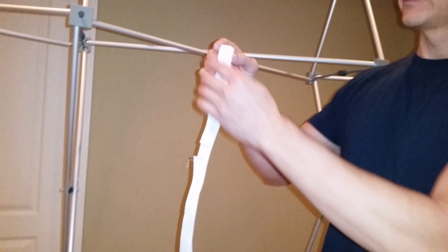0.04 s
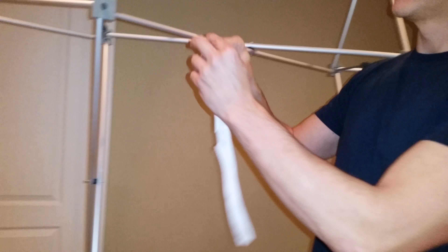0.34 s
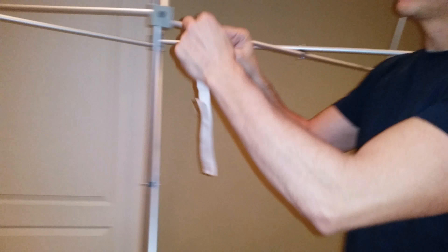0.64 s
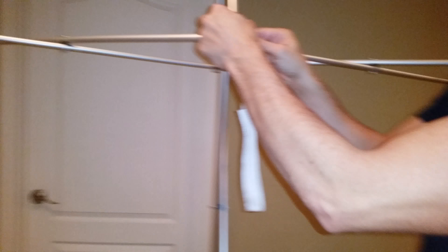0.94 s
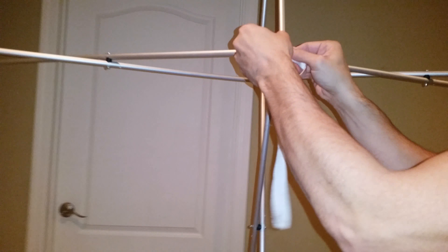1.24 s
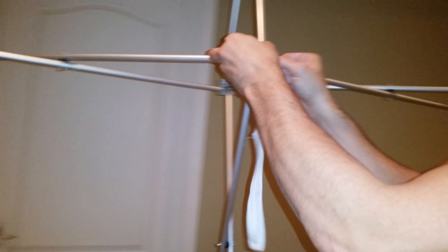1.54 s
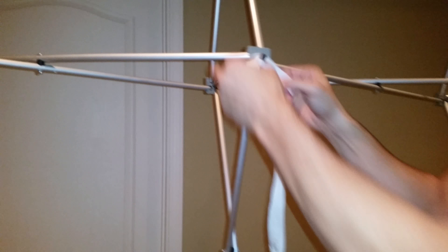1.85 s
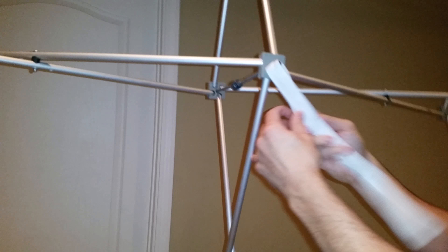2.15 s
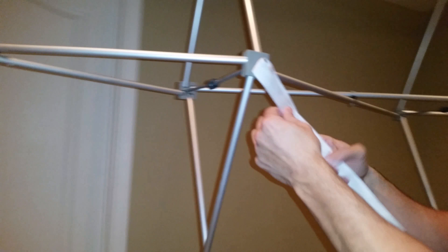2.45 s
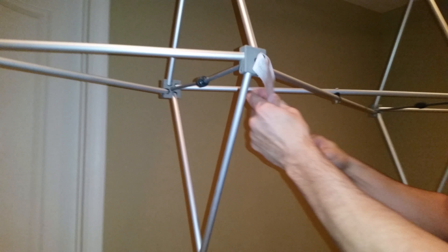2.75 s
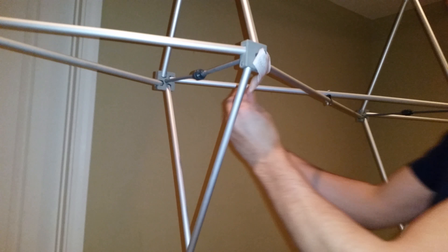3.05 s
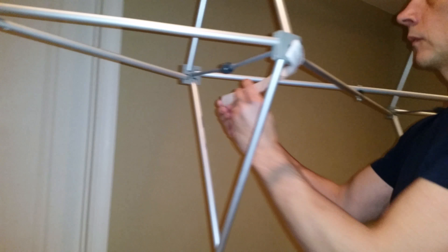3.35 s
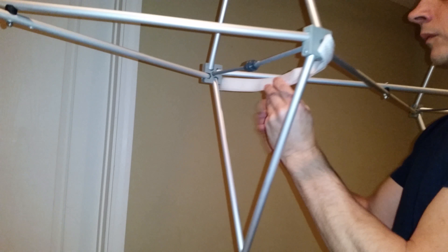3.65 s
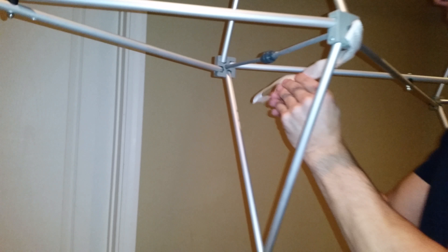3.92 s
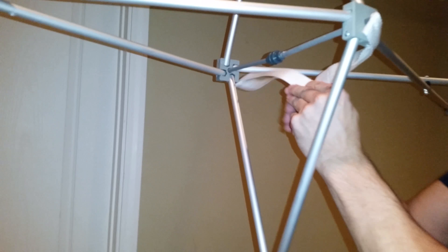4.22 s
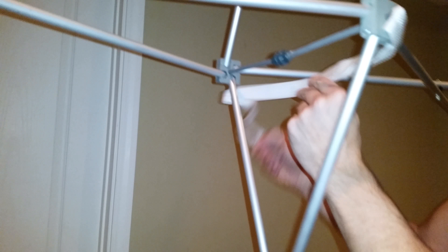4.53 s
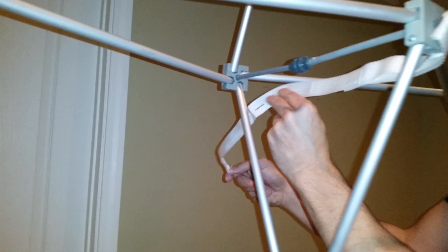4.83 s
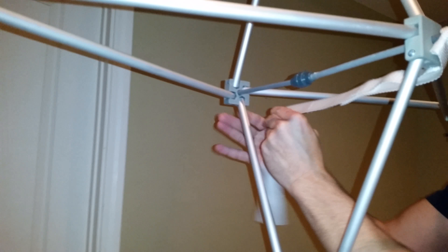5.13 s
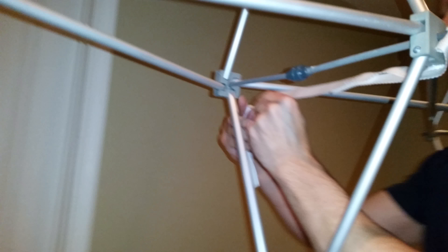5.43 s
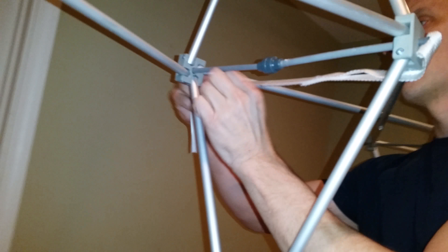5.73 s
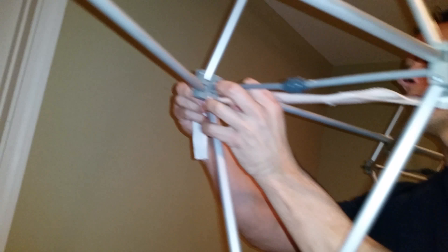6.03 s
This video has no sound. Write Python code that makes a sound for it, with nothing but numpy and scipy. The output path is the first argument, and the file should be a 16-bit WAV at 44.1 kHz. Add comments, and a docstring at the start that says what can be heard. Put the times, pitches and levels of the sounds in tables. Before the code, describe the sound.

A low, steady rumble fills a small room, with the action close to a hand-held microphone. In the first second, several dull handling knocks sound over soft rubbing as a fabric strap slides on a metal tube frame. Light taps ring briefly on the tubes at about 0.3 and 1.7 seconds. From 2 to 2.6 seconds, the strap's hook-and-loop surface crackles and snaps, with a tiny tear near 2.2 seconds and soft bumps against the frame. Faint, scattered rustling continues until about 4.2 seconds. At 4.4 seconds, sharp snaps build quickly into one short, bright rip, the loudest sound, over by 4.6 seconds. The room rumble ducks for a moment and creeps back. Quieter rubbing and stray crackles follow, with faint ticks near 5.3 seconds and a quick cluster of light metallic taps around 5.9 to 6 seconds.

```python
"""A small room, rumbling low; the two microphone ports of a hand-held camera are close to a metal tube frame.
A hook-and-loop strap is threaded round the frame's hub: hands and webbing rub and tap the tubes, hooks
crackle and snap, and one short rip makes the gain control duck the room's rumble.
Fingers knock on the camera body; its right port rings in the high treble."""
import sys
import numpy as np
from scipy import signal
from scipy.fft import rfft, irfft
from scipy.io import wavfile
from scipy.ndimage import minimum_filter1d

SR = 44100
rng = np.random.default_rng(int(sys.argv[2]) if len(sys.argv) > 2 else 0)


def output_pcm(signal):
    """Save a mono or channel-first signal as 16-bit PCM at the path in sys.argv[1].

    Samples are clipped to [-1, 1] before scaling.
    """
    pcm = np.clip(np.atleast_2d(signal).T, -1, 1) * 32767
    wavfile.write(sys.argv[1], SR, np.round(pcm).astype(np.int16))


N = 268128
T = np.arange(N) / SR


def undb(db):
    """Decibels to gain."""
    return 10 ** (np.asarray(db) / 20)


def unit(x):
    """Scale to rms 1."""
    return x / np.sqrt(np.mean(x ** 2) + 1e-18)


def curves(table):
    """The columns of a table, joined by straight lines in time."""
    s, *columns = np.transpose(table)
    return [np.interp(T, s, column) for column in columns]


def add(track, s, sound):
    """Mix a two-port sound into a track at s seconds."""
    i = max(int(s * SR), 0)
    track[:, i:i + sound.shape[1]] += sound[:, :max(N - i, 0)]


def colour(x, points, size=4096):
    """Causal (minimum-phase) filter through points of f/Hz, gain/dB."""
    hz, db = np.transpose(points)
    bins = np.maximum(np.arange(size // 2 + 1) * SR / size, 1)
    gain = undb(np.interp(np.log(bins), np.log(hz), db))
    cepstrum = irfft(np.log(gain))
    cepstrum[1:size // 2] *= 2
    cepstrum[size // 2 + 1:] = 0
    response = np.array(irfft(np.exp(rfft(cepstrum))), ndmin=x.ndim)
    return signal.oaconvolve(x, response, axes=-1)[..., :N]


def resonance(x, hz, q):
    """One broad resonance, its Q no lower than 0.5."""
    return signal.lfilter(*signal.iirpeak(min(hz, SR / 4), max(q, .5), fs=SR), x)


def walk(rate):
    """Random drift with a spread near 1, turning rate times a second for up to 2048 turns."""
    knots = rng.standard_normal(2048)
    return np.interp(T * rate, np.arange(len(knots)), knots)


def grains(rate, spread_db, lag_samples=5):
    """Tiny uneven clicks; each comes from its own spot, so with its own lag between the ports."""
    hit = rng.random(N) < rate / SR
    size = undb(spread_db * np.clip(rng.standard_normal(N), -2, 2))
    left = unit(hit * size * rng.choice([-1, 1], N))
    arrival = (np.arange(N) + rng.integers(-lag_samples, lag_samples + 1, N)) % N
    return np.array([left, np.bincount(arrival, left, N)])


def stroke(source, s, length, edge_s):
    """A stretch of a source that swells and fades at its edges."""
    part = source[:, int(s * SR):int((s + length + edge_s) * SR)]
    t = np.arange(part.shape[1]) / SR
    return part * np.clip(np.minimum(t, length + edge_s - t) / edge_s, 0, 1)


def rubs(table, source, edge_s):
    """Short strokes of contact, each twice through a resonance of its own."""
    out = np.zeros((2, N))
    for s, length, db, hz, q in table:
        contact = stroke(source, s, length, edge_s)
        ringing = resonance(resonance(contact, hz, q), hz, q)
        add(out, s, undb(db) * unit(ringing))
    return out


def room(x, wet_db, first_s=0.0033, t60_s=0.33):
    """Near walls answer within milliseconds, differently at each port, and die away."""
    t = np.arange(SR // 2) / SR
    onset = np.clip(t / first_s - 1, 0, 1)
    tails = rng.standard_normal((2, len(t))) * undb(-60 * t / t60_s) * onset
    tails /= np.linalg.norm(tails, axis=1, keepdims=True)
    return x + undb(wet_db) * signal.fftconvolve(x, tails, axes=1)[:, :N]


def room_tone(apart_hz=520, apart_db=-17, murmur_db=-52.5, hiss_db=-68.5):
    """Rumble, nearly alike at both ports in the bass, over the building's murmur, drones and faint hiss."""
    # course of the room's rumble: t/s, level/dB
    rumble_levels = [(0.0, -43), (1.1, -45), (1.45, -45.5), (2.6, -44.5), (2.95, -46), (3.25, -46.5),
                     (4.35, -48.5), (4.7, -44.5), (6.08, -49.5)]
    # spectra of the rumble, the building's deep murmur and the hiss: f/Hz, level/dB
    rumble_colour = [(20, -14.5), (42, -10), (58, -3.5), (100, 1.5), (150, -1.5), (240, -6.5), (320, -11.5),
                     (480, -20), (700, -27.5), (1200, -33), (3000, -47.5), (9000, -80)]
    murmur_colour = [(18, -9), (30, -10.5), (45, -9.5), (62, 3.5), (85, -8.5), (120, -12.5), (250, -38),
                     (1000, -57.5)]
    hiss_colour = [(1000, -4), (2200, 0), (3200, 12), (4500, -4.5), (7500, -14.5), (9000, -18.5),
                   (11000, -6.5), (16000, 1.5)]
    # wavering drones in the room: f/Hz, level/dB
    drone_tones = [(59.5, -50.5), (79, -52.5), (104, -51.5), (145, -56), (251, -61.5), (473, -65)]
    rumble_db, = curves(rumble_levels)
    mid, side = unit(colour(rng.standard_normal((2, N)), rumble_colour))
    side = signal.lfilter(*signal.butter(1, apart_hz, "high", fs=SR), side) + undb(apart_db) * side
    rumble = np.array([mid + side, mid - side]) * undb(rumble_db + 1.3 * walk(18))
    murmur = undb(murmur_db) * unit(colour(rng.standard_normal(N), murmur_colour))
    drones = sum(undb(db + 2 * walk(12)) * np.sin(2 * np.pi * hz * T + walk(7)) for hz, db in drone_tones)
    hiss = undb(hiss_db) * unit(colour(rng.standard_normal((2, N)), hiss_colour))
    return rumble + murmur + drones + hiss


def camera_knocks(rattle_db=-21, rattle_s=0.046, lag_s=0.0006, lowest_hz=120):
    """Handling noise: a fingertip sets the case ringing and rattling; the flex reaches the right port late."""
    # finger knocks: t/s, level/dB, contact time/s, right port against left/dB
    knocks = [(0.0165, -9, 0.00089, -21), (0.1629, -13, 0.0006, -17), (0.2246, -24.5, 0.00063, -27),
              (0.398, -13.5, 0.0041, -0.5), (0.439, -16, 0.00093, -10), (0.879, -15.5, 0.003, 0),
              (1.442, -23.5, 0.00072, -20)]
    # modes of the camera body: f/Hz, level/dB, t60/s
    case_modes = [(188, -6, 0.039), (247.2, -10, 0.22), (284, -7, 0.0043), (455, -1, 0.016),
                  (527, -11.5, 0.033), (495, -21, 0.19), (750, -12, 0.011), (1840, -4, 0.0037)]
    out, t = np.zeros((2, N)), np.arange(SR // 4) / SR
    ring = sum(undb(db - 60 * t / t60) * np.sin(2 * np.pi * hz * t) for hz, db, t60 in case_modes)
    for s, db, contact_s, right_db in knocks:
        push = np.sin(np.pi * np.minimum(t / contact_s, 1)) ** 2
        rattle = unit(resonance(rng.standard_normal(len(t)), hz=324, q=1.2))
        rattle *= undb(rattle_db) * np.exp(-t / rattle_s)
        left = undb(db) * signal.fftconvolve(ring + rattle, push / push.sum())[:len(t)]
        right = undb(right_db) * np.interp(t - lag_s, t, left)
        add(out, s, np.array([left, right]))
    return signal.sosfilt(signal.butter(2, lowest_hz, "high", fs=SR, output="sos"), out)


def frame_bumps():
    """Hands bump softly against the frame; the long waves reach both ports alike."""
    # bumps: t/s, length/s, level/dB, centre f/Hz, Q
    bumps = [(.398, .016, -31, 265, 1.8), (.685, 0.021, -51.5, 490, 1.45), (.876, 0.029, -37.5, 297, 0.53),
             (1.51, 0.011, -47, 403, 1.02), (2.005, 0.033, -54.5, 600, 0.34), (2.37, 0.06, -52.5, 460, 1.6),
             (3.625, 0.027, -45.5, 292, 0.9), (4.165, 0.026, -58.5, 900, 0.68),
             (5.315, 0.015, -60, 740, 1.4), (5.36, 0.029, -62.5, 1008, .5)]
    return rubs(bumps, np.tile(rng.standard_normal(N), (2, 1)), edge_s=0.0089)


def tube_taps(contact_db=5, contact_s=0.00067, contact_hz=5000):
    """A hard touch clicks and sets a tube ringing briefly, each mode with its own strength at each port."""
    # taps of the strap's end and fingernails: t/s, level/dB
    taps = [(0.2876, -43), (1.7236, -42.5), (5.317, -52), (5.342, -51), (5.8619, -47.5), (5.9335, -46),
            (5.943, -40.5), (5.951, -51), (5.9769, -40), (6.0368, -46)]
    # modes of a tube: f/Hz, level/dB, t60/s
    tube_modes = [(2060, -12, 0.017), (3580, -8, 0.039), (4320, -5, 0.026), (5270, -10.5, .04),
                  (6000, -13, 0.038), (7600, -14, .05), (8387, -18, 0.064)]
    out, t = np.zeros((2, N)), np.arange(SR // 4) / SR
    modes = np.array([undb(db - 60 * t / t60) * np.sin(2 * np.pi * hz * t) for hz, db, t60 in tube_modes])
    for s, db in taps:
        signs = rng.choice([-1, 1], (2, len(modes)))
        strengths = undb(2 * rng.standard_normal((2, len(modes))))
        ring = (signs * strengths) @ modes
        click = undb(contact_db) * rng.standard_normal((2, len(t))) * np.exp(-t / contact_s)
        add(out, s, undb(db) * (ring + resonance(click, contact_hz, q=0.5)))
    return out


def webbing_drags():
    """The webbing slides over a tube, which rings."""
    # slides: t/s, length/s, relative level/dB, centre f/Hz, Q
    drags = [(.02, 0.049, -60, 3270, 3.6), (.262, 0.022, -47, 2020, 1.9), (.39, 0.11, -55.5, 2320, 2.8),
             (.565, 0.03, -47.5, 3900, 0.75), (.59, 0.11, -53.5, 2730, 1.2), (.785, 0.072, -53, 2470, 1.3),
             (.872, 0.12, -47.5, 1760, 0.78), (1.58, 0.025, -54.5, 3240, 0.87),
             (1.698, 0.029, -47.5, 3600, 2), (1.86, 0.022, -53.5, 2800, 1.8),
             (1.995, 0.049, -44.5, 1790, 0.55), (2.235, 0.043, -42.5, 4300, .8),
             (2.37, 0.047, -45.5, 1710, 1.5), (2.51, 0.022, -50, 2210, 1.8), (2.85, 0.17, -57.5, 2440, 2.3),
             (3.215, 0.022, -52, 2130, 0.31), (3.635, .04, -64, 2180, 1.6), (4.378, 0.02, -43.5, 1900, 1.1),
             (4.398, .012, -34.5, 5700, 3.1), (4.505, 0.088, -29.5, 2430, 0.31),
             (5.545, 0.036, -52.5, 3340, 0.55), (5.93, 0.022, -55, 4550, 1.3)]
    return rubs(drags, grains(rate=1100, spread_db=4), edge_s=0.0081) * undb(-2.5)


def cloth(db):
    """Skin and webbing rub: dense fibre slips under uneven pressure."""
    # spectrum of the rubbing: f/Hz, level/dB
    cloth_colour = [(150, -4), (500, 4.5), (1300, 0.5), (2500, 1.5), (4000, 1.5), (6000, -8), (7600, -15),
                    (11500, -18), (16000, -13)]
    slips = unit(colour(grains(rate=7000, spread_db=1.5), cloth_colour))
    pressure_db = 3 * walk(45)
    return slips * undb(db - 2.14 + pressure_db)


def loose_hooks(db, stray_db=-8):
    """Hooks brush over the weave, and now and then a stray one flicks free."""
    # spectrum of the crackle: f/Hz, level/dB
    hook_colour = [(300, -31.5), (1500, -7), (4000, 5.5), (6000, 4), (9000, 4.5), (12000, 4.5),
                   (16000, -5.5)]
    unevenness_db = 2 * walk(90) + 1.4 * walk(22)
    crackle = grains(rate=2200, spread_db=-0.5) + undb(stray_db) * grains(rate=82, spread_db=4.5)
    return unit(colour(crackle, hook_colour)) * undb(db - 1.1 + unevenness_db)


def hook_snaps(left_tick_db=-4, shiver_s=0.0007, shiver_db=-15):
    """A taut hook lets go with a tick, louder on the right; the backing flicks and nearby fibres shiver."""
    # single hooks letting go: t/s, tick level/dB, flick level/dB
    snaps = [(0.2847, -29, -11.5), (0.996, -17.5, -16), (1.5871, -26.5, -19), (1.724, -29, -7),
             (2.098, -10.5, -5), (2.1701, 1, 0.5), (2.2445, -11, -14), (2.251, -6, -4), (2.2586, -22, -24),
             (2.274, -7, 3), (2.414, -16, -21), (2.489, -3, -2), (2.522, -17, -3), (2.6041, -24, -15),
             (3.238, -15, -26), (3.2732, -22.5, -27), (4.17, -24, -16.5), (4.3748, -18, -10),
             (4.382, -5.5, -7), (4.389, -3.5, -12.5), (4.3963, 1.5, -7), (4.4, -3, -1.5), (4.407, 4.5, 3),
             (4.424, 0, -5), (4.43, 7.5, -3), (4.44, 3, -3), (4.462, -1, -14), (4.4705, 7, 1.5),
             (4.4826, 7.5, -7), (4.503, 5.5, 10), (4.509, 7, 6), (4.5212, 5, -6.5), (4.545, 4, -0.5),
             (4.5593, 7, 3), (4.5673, 7.5, -3), (5.978, -27, -24)]
    # spectra of the hook's sharp tick and the backing's flick: f/Hz, level/dB
    tick_colour = [(1000, -43.5), (5000, -1.5), (8000, 2.5), (10500, 1.5), (13000, 0.5), (16000, 1)]
    flick_colour = [(200, -47.5), (1000, -32), (1800, -10), (4000, -10), (6000, -7.5), (8000, -16.5),
                    (11000, -16.5), (16000, -33)]
    ticks, flicks = np.zeros((2, N)), np.zeros((2, N))
    t = np.arange(256) / SR
    for s, tick_db, flick_db in snaps:
        click = undb(shiver_db) * rng.standard_normal((2, len(t))) * np.exp(-t / shiver_s)
        # the first edge reaches the two ports a few samples apart
        click[[0, 1], rng.integers(0, 6, 2)] = 1
        click /= np.linalg.norm(click, axis=1, keepdims=True)
        add(ticks, s, undb([[tick_db + left_tick_db], [tick_db]]) * click)
        add(flicks, s, undb(flick_db) * click)
    return colour(ticks, tick_colour) + colour(flicks, flick_colour)


def hook_tears():
    """Rows of hooks peel off in quick clusters; the loud rip comes at about 4.5 s."""
    # patches peeling off: t/s, length/s, relative level/dB
    tears = [(0.26, 0.025, -63), (0.575, 0.057, -65.5), (0.989, 0.0082, -52.5), (1.023, .02, -61),
             (1.586, 0.03, -65), (1.711, 0.019, -60), (1.953, 0.041, -53.5), (2.229, 0.035, -34),
             (2.509, 0.014, -45), (3.219, 0.023, -52), (3.739, 0.042, -59), (3.948, 0.03, -68.5),
             (4.162, 0.018, -65), (4.381, 0.066, -40), (4.467, 0.025, -29.5), (4.499, 0.045, -22),
             (4.544, 0.032, -19.5), (5.064, 0.02, -58), (5.448, 0.011, -63), (5.555, 0.031, -66),
             (5.638, 0.018, -69.5), (5.924, 0.014, -64)]
    # spectrum of the tearing: f/Hz, level/dB
    tear_colour = [(300, -3.5), (1200, -6.5), (3500, 4), (6000, 7), (9000, 11.5), (11300, 4.5),
                   (13500, 7.5), (16000, -4.5)]
    clusters_db = 3 * walk(450)
    hooks = grains(rate=2400, spread_db=4.5) * undb(clusters_db)
    out = np.zeros((2, N))
    for s, length, db in tears:
        add(out, s, undb(db - 2.5) * unit(stroke(hooks, s, length, edge_s=0.011)))
    return colour(out, tear_colour)


def scene():
    """Strap and frame close up with some room on them, dry knocks on the camera, room tone behind."""
    # how hard the hands work the strap: t/s, rubbing level/dB, crackle level/dB
    hands = [(0.0, -61, -72), (0.45, -56.5, -61.5), (0.76, -56.5, -71.5), (0.96, -50.5, -63),
             (1.52, -71, -83.5), (1.62, -61, -75), (1.83, -57, -65), (1.95, -55, -48), (2.17, -55.5, -54.5),
             (2.43, -48.5, -43), (2.56, -58, -60), (3.05, -63, -57.5), (3.25, -57, -60), (3.33, -65, -66.5),
             (3.55, -68, -67), (3.74, -60.5, -59), (4.12, -81, -74.5), (4.36, -60.5, -59),
             (4.79, -61.5, -58.5), (5.02, -70, -78.5), (5.28, -100, -82), (5.43, -59.5, -72),
             (5.72, -79, -76.5), (5.86, -59.5, -61.5), (6.08, -63, -68)]
    cloth_db, hooks_db = curves(hands)
    drags, bumps = webbing_drags(), frame_bumps()
    friction = room(cloth(cloth_db), wet_db=-5) + room(drags, wet_db=-2.5)
    hooks = room(loose_hooks(hooks_db) + hook_tears(), wet_db=-9.5)
    ticks = room(hook_snaps(), wet_db=-17.5) + room(tube_taps(), wet_db=-5.5)
    return friction + hooks + ticks + room(bumps, wet_db=-5) + camera_knocks() + room_tone()


def gain_control(x, threshold_db=-22.5, slope=0.97, sense_s=0.032, quick_db_per_s=50,
                 held_share=0.65, hold_s=0.56, slow_db_per_s=14):
    """Sustained loudness ducks both channels; part of the cut lets go fast, the rest holds, then creeps back."""
    def release(db, rate):
        return np.maximum.accumulate(db + rate * T) - rate * T

    pole = np.exp(-1 / (sense_s * SR))
    power = signal.lfilter([1 - pole], [1, -pole], np.max(x ** 2, axis=0))
    cut_db = slope * np.maximum(10 * np.log10(power + 1e-12) - threshold_db, 0)
    hold = int(hold_s * SR) | 1
    held_db = -held_share * minimum_filter1d(-cut_db, hold, origin=hold // 2, mode="constant")
    return x * undb(-np.maximum(release(cut_db, quick_db_per_s), release(held_db, slow_db_per_s)))


def record(dry, top_hz=15750):
    """The camera's microphone: each port colours the sound, gain control follows and the top is cut."""
    # responses of the ports, the right one ringing near 11 kHz: f/Hz, gain/dB
    left_port = [(1000, -2.5), (6000, 1), (8500, -5), (11200, 6), (14000, 0.7), (16000, 4.5)]
    right_port = [(200, -2.5), (500, -4.5), (1000, -5), (2000, -8.5), (3700, -9.5), (5500, -14.5),
                  (7200, -16), (8700, -5.5), (10000, 7.5), (11000, 19), (11800, 17.5), (13000, 9.5),
                  (14200, 5), (16000, 14)]
    ports = np.array([colour(dry[0], left_port), colour(dry[1], right_port)])
    top_cut = signal.ellip(10, .2, 80, top_hz, fs=SR, output="sos")
    return signal.sosfilt(top_cut, gain_control(ports))


dry = scene()
out = record(dry)
output_pcm(out)
```